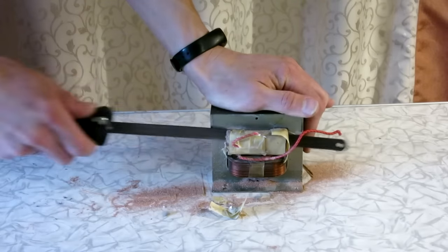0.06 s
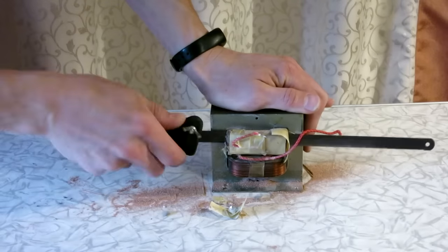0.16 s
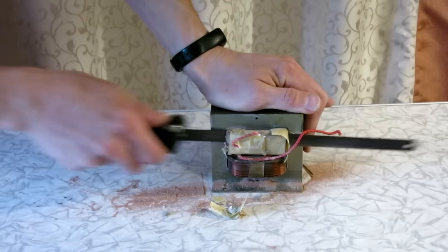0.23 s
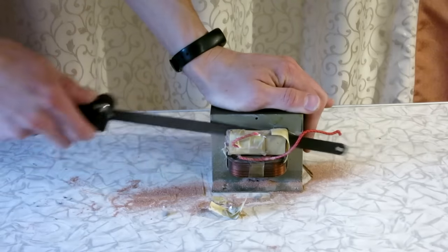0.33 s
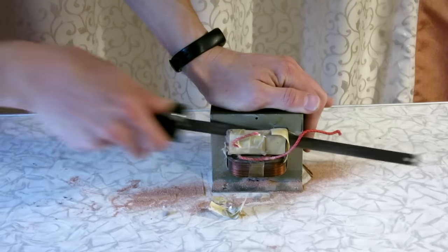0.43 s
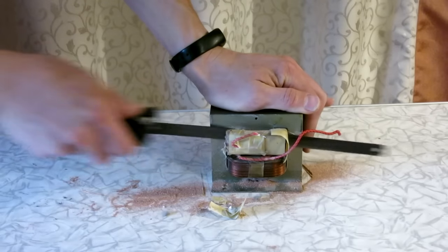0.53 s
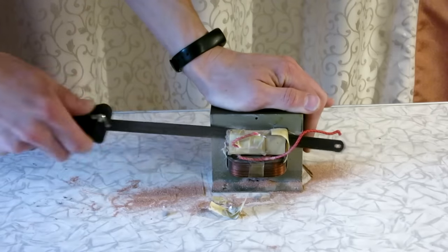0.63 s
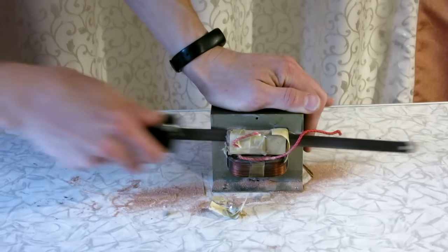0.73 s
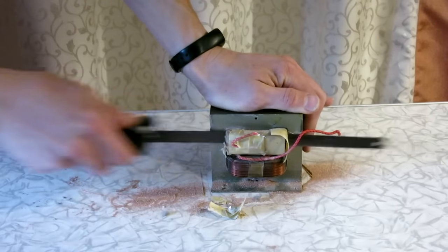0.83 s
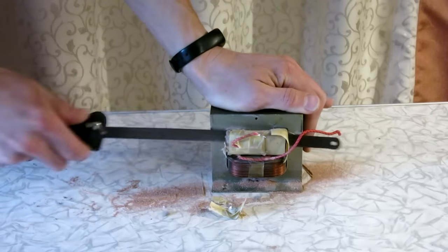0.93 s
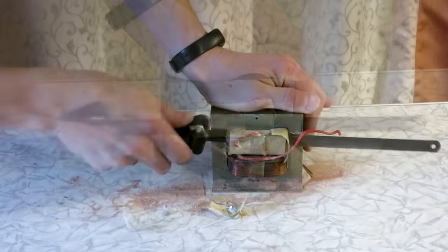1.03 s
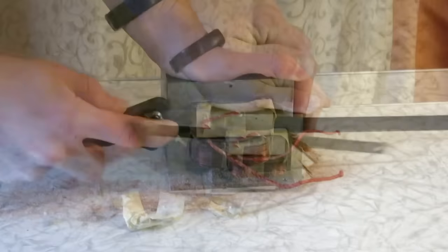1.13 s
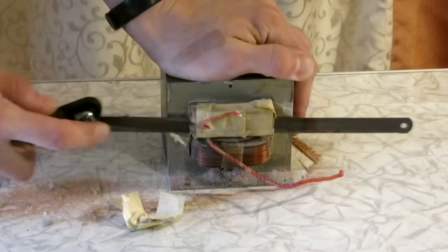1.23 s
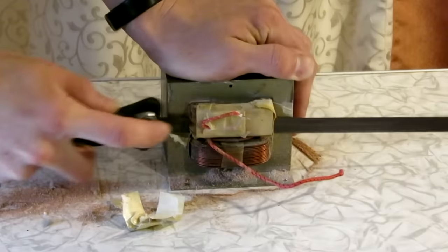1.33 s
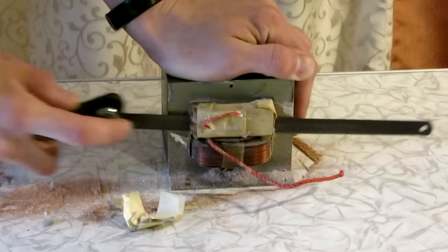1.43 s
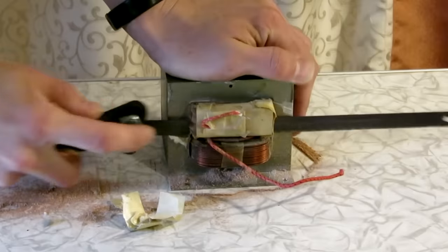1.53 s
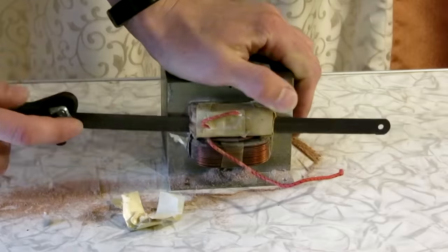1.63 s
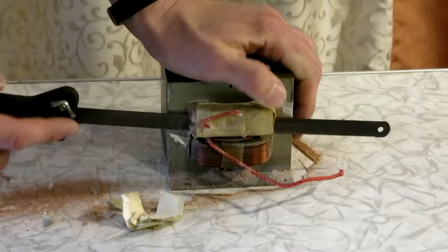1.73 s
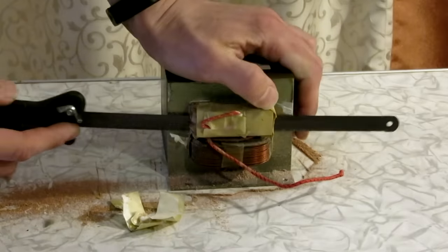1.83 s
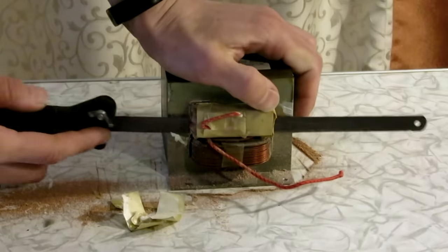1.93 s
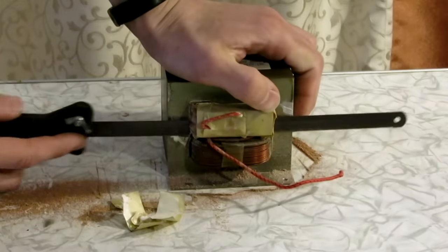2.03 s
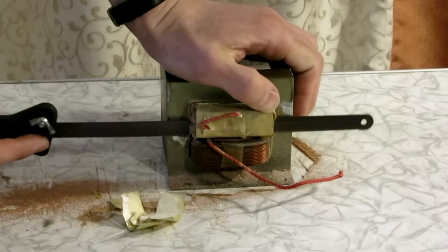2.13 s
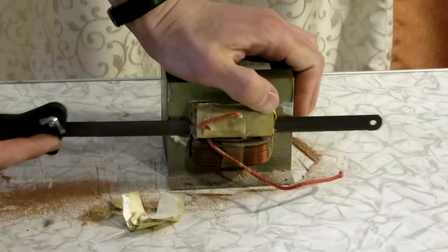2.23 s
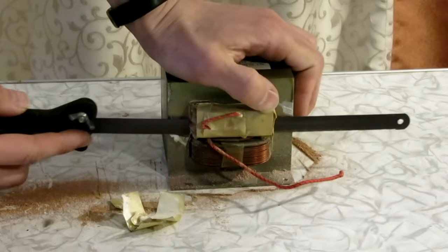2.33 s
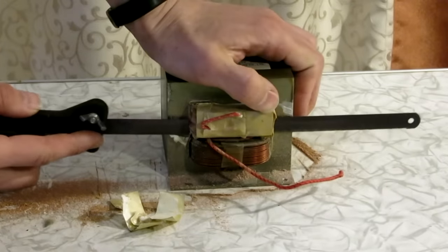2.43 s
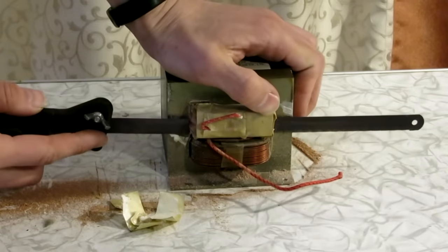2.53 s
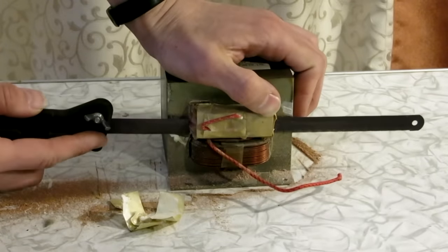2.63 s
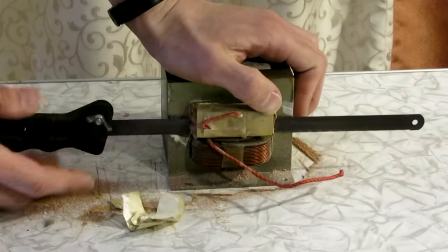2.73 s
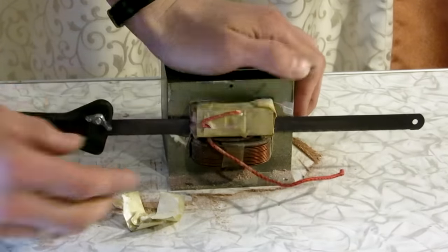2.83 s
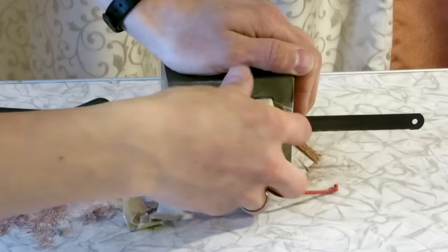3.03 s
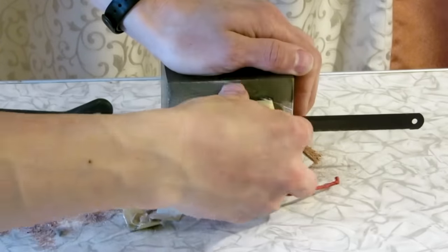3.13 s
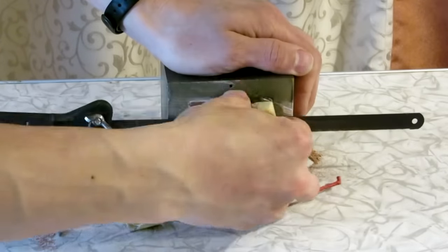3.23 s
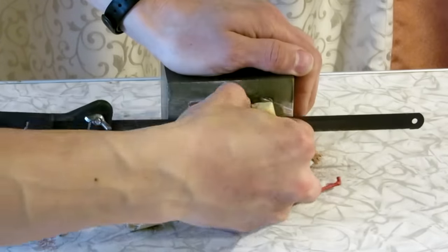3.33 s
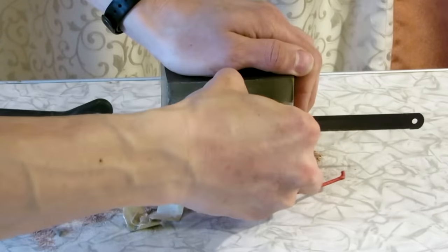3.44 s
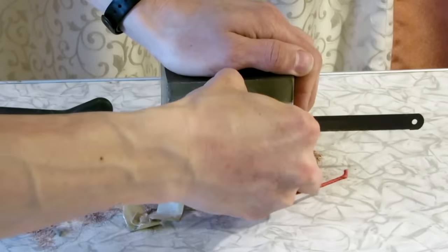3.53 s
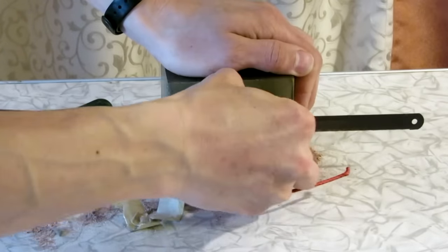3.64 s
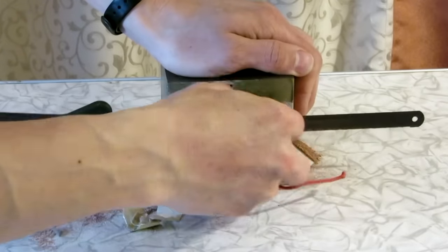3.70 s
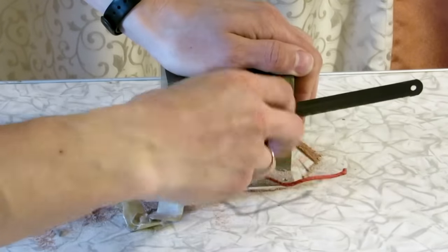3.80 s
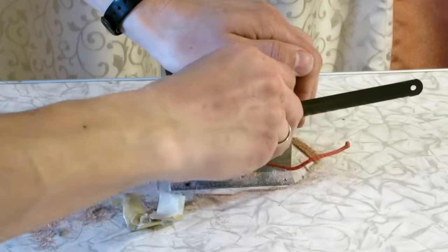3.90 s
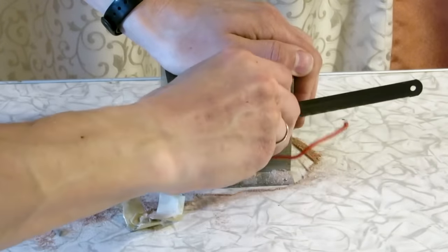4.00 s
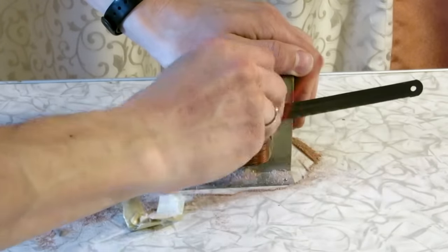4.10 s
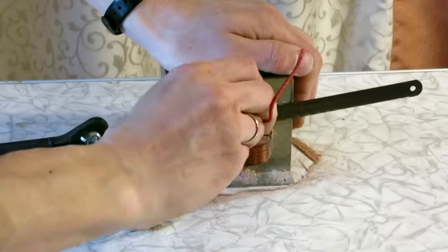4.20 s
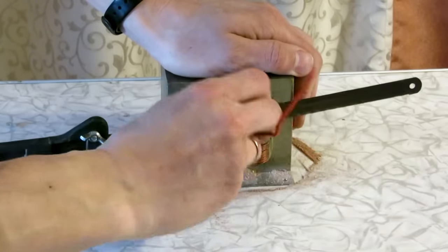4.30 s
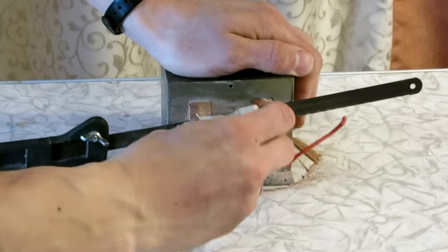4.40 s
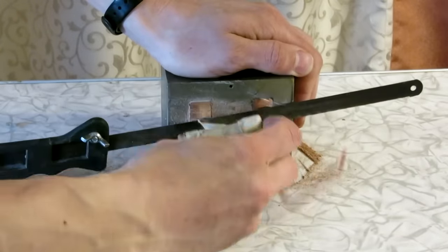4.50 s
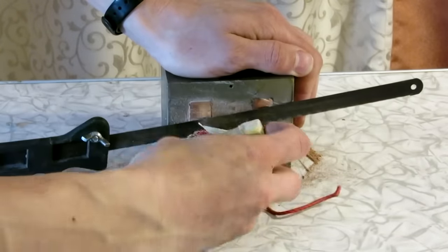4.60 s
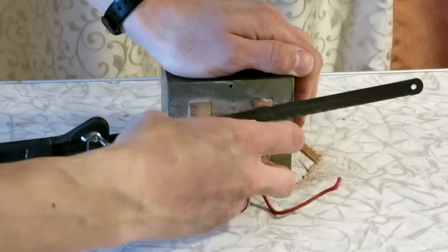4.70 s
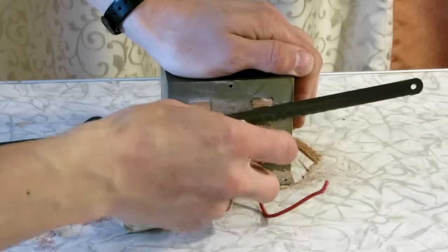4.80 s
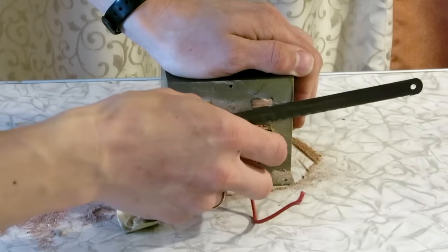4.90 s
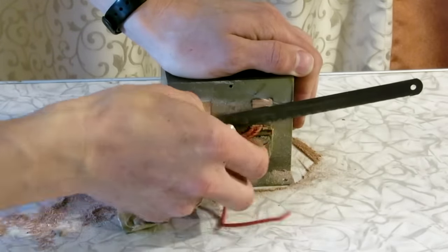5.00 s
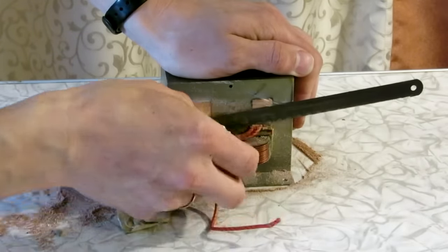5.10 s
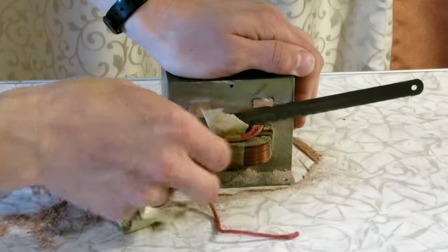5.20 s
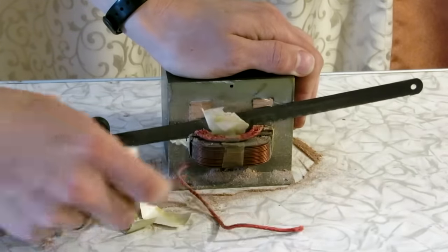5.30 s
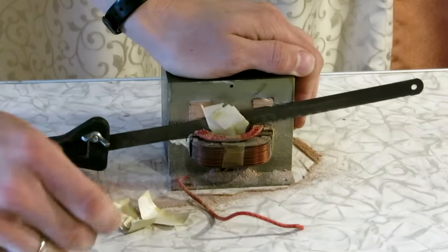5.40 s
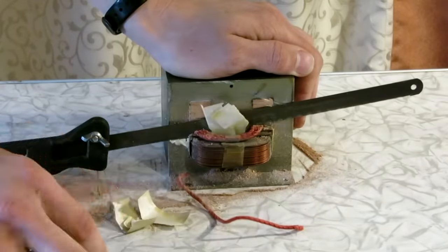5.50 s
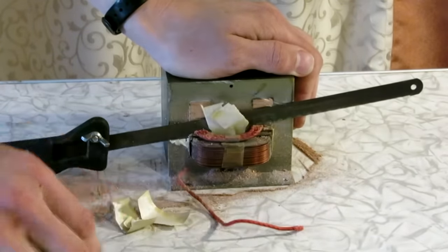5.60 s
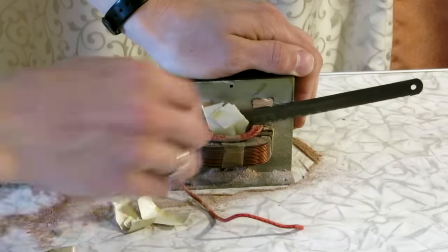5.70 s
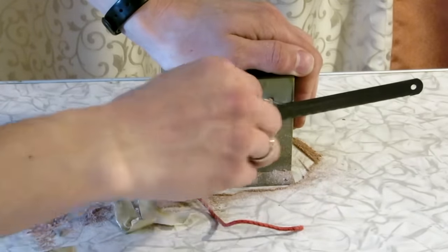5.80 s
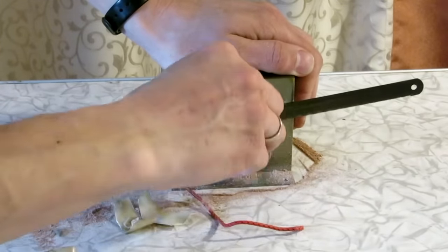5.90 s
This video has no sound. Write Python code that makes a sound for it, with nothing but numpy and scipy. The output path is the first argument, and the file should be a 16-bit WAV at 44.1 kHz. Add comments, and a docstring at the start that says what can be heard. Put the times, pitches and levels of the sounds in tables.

```python
"""A bare hacksaw blade cuts a copper winding on an iron core: bursts of tiny tooth catches make
the rasp and ring the blade, the core and the table it stands on. Then the blade slides loosely in
the slot as hissing noise, and fingers crackle the paper wrap as uneven catches. Wire and paper snap
as a tick and a short ring, and the core bumps the table. Each sound rings in a small furnished room
with faint, nearly steady house noise, as heard by a phone close by."""
import sys
import numpy as np
from scipy import signal
from scipy.fft import rfft, irfft
from scipy.io import wavfile
from scipy.ndimage import uniform_filter1d

SR = 44100
rng = np.random.default_rng(int(sys.argv[2]) if len(sys.argv) > 2 else 0)


def put_to_file(sound):
    """Save the sound as 16-bit audio at rate SR, in the file named by the first command-line argument."""
    columns = np.atleast_2d(sound).T  # one column per channel
    safe = np.clip(columns, -1, 1)
    whole_steps = np.round(safe * 32767)
    wavfile.write(sys.argv[1], SR, whole_steps.astype(np.int16))


N = 262395  # length [samples]
TIMES = np.arange(0, N + 16, 16) / SR  # moments at which gestures are worked out [s]
LINGER = 0.7  # the heavy table follows a gesture more slowly: share of its dB slope

# ringing tones of the saw blade: (frequency [Hz], width [Hz], level [dB])
BLADE_MODES = [(1676, 54, 4), (1806, 55, 2), (1963.5, 35, 11.5), (2216, 230, 5.5), (2250, 410, -2),
               (2540, 50, -1), (2563, 50, -4.5), (2800, 36, 5.5), (2910, 64, 1.5)]
# ringing tones of the iron core: (frequency [Hz], width [Hz], level [dB])
CORE_MODES = [(562, 23, 2), (630, 44, 2.5), (701, 22, 0), (747, 35, 2), (884, 63, -4.5), (996, 82, 6),
              (1084, 33, -6.5), (1163, 60, -2), (1350, 51, -10), (1420, 61, -8.5), (1800, 150, 9.5)]
# ringing tones of the table: (frequency [Hz], width [Hz], level [dB])
TABLE_MODES = [(105, 24, -25.5), (149, 14, -12.5), (180, 12, 11.5), (212, 9.4, 7), (318, 29, 5),
               (420, 60, 3), (503, 40, 6.5), (637, 28, 5)]
# ringing tones of loose wire ends: (frequency [Hz], width [Hz], level [dB])
WIRE_MODES = [(2520, 150, -2), (2800, 110, -2.5), (3500, 88, 0.5), (4300, 250, 4), (4800, 140, 1),
              (5350, 250, 1), (5500, 300, -3.5), (6020, 440, 0.5), (6800, 390, 2), (7600, 450, -1),
              (8600, 500, 1), (9700, 890, 1.5), (10800, 1000, 4), (12200, 900, 1.5)]
# tone colour of crackling paper: (frequency [Hz], level [dB])
PAPER_COLOUR = [(1060, -32.5), (1800, -16), (2090, -14), (2940, 4), (3380, -9.5), (5480, 4.5), (7500, 1),
                (11100, 4), (15500, -2.5), (16500, -23)]
# tone colour of scraping: (frequency [Hz], level [dB])
SCRAPE_COLOUR = [(500, -8), (900, 9.5), (1500, 12.5), (2400, 4), (3400, -17), (5000, -100)]
# wire and paper snap: (time [s], peak [dB], pitch [Hz], ring against the tick [dB])
SNAPS = [(1.409, -15.5, 4350, 0.5), (1.5978, -6.5, 4570, -4.5), (1.8636, -31, 11600, -7),
         (1.8726, -43, 11500, -9), (1.8992, -25, 9800, -2), (1.937, -23.5, 8600, -3),
         (1.945, -11, 7600, -10), (2.0592, -18.5, 5100, -8), (2.088, -20, 5560, -4),
         (2.1853, -14.5, 9700, -7.5), (2.285, -22.5, 7550, 3.5), (2.3218, -21, 7930, 1.5),
         (2.8365, -43, 10600, -2), (3.1644, -33, 7600, -10), (3.276, -40, 9240, -1.5),
         (3.4319, -30, 9370, -8), (3.5161, -3, 5200, -19), (3.7618, -17, 2800, -6), (3.7709, -23, 6050, 6),
         (3.843, -23.5, 2520, -3.5), (3.898, -32.5, 7530, -6), (4.005, -15.5, 3500, -11),
         (4.013, -20, 6800, 1), (4.0374, -28, 5340, -0.5), (4.0798, -21, 10800, -3),
         (4.1005, -6.5, 5770, -5), (4.111, -33, 2800, -14), (4.1832, -33, 12200, 0),
         (4.19, -26.5, 8700, -10), (4.2217, -16.5, 5700, -8), (4.2336, -14, 2520, -17),
         (4.2652, -14, 5300, -10), (4.3416, -7.5, 9000, -11.5), (4.3854, -12, 6900, -27),
         (4.457, -30, 10100, -11), (4.4646, -34, 11800, -7), (4.523, -27.5, 12300, -8),
         (4.562, -18, 12200, -7), (4.575, -16.5, 11600, -17), (4.7052, -42, 10500, -1),
         (4.737, -32.5, 9800, -22), (4.8127, -43.5, 5550, -8), (4.925, -32, 8100, -18),
         (5.148, -31, 8700, -12), (5.1826, -20.5, 11600, -14), (5.2126, -9, 2500, -21),
         (5.2289, -15, 2580, -25), (5.402, -43, 10800, -1), (5.4957, -42, 5350, -6),
         (5.617, -36.5, 9700, -1), (5.669, -50, 4800, -1)]


def undb(db):
    """Turn decibels into a gain."""
    return 10 ** (np.asarray(db) / 20)


def unit(x):
    """Scale a sound to an average (RMS) level of 1."""
    return x / np.sqrt(np.mean(x ** 2))


def cut(x, hz, kind):
    """Gentle low- or high-pass."""
    return signal.sosfilt(signal.butter(2, hz, kind, fs=SR, output="sos"), x)


def colour(x, points, share=1):
    """Filter whose gain follows (Hz, dB) points and which never sounds ahead of its input."""
    hz, db = np.transpose(points)
    bin_hz = np.arange(1025) * SR / 2048
    gain_db = np.interp(np.log(bin_hz + 1), np.log(hz), share * db)
    # folding the cepstrum puts the filter's energy as early as possible
    cepstrum = irfft(gain_db * np.log(10) / 20)
    cepstrum[1:1024] *= 2
    cepstrum[1025:] = 0
    response = irfft(np.exp(rfft(cepstrum)))
    return signal.fftconvolve(x, response)[:len(x)]


def ring(x, hz, width):
    """One resonance, gain 1 at its centre."""
    return signal.lfilter(*signal.iirpeak(hz, hz / width, SR), x)


def walk(rate):
    """Random levels, a new one every 1 / rate seconds with smooth slopes between; spread near 1."""
    step = int(SR / rate)
    held = np.repeat(rng.standard_normal(N // step + 1), step)
    return 1.31 * uniform_filter1d(held, step)[:N]


def grit(per_s, spread_db, burst_db, burst_rate):
    """Tiny random catches of uneven size that come in bursts."""
    hit = rng.random(N) < per_s / SR
    size = undb(spread_db * rng.exponential(size=N)) * rng.standard_normal(N)
    return unit(hit * size * undb(burst_db * walk(burst_rate)))


def body(drive, modes, patchy_db, pitch, reach):
    """Modes of a solid that swell each alone; those near the given pitch ring most."""
    out, power = 0, 0
    for hz, width, db in modes:
        near = undb(db) / (1 + (np.log(hz / pitch) / reach) ** 2)
        patches = undb(patchy_db * walk(30)) if patchy_db else 1
        out = out + near * patches * unit(ring(drive, hz, width))
        power = power + near ** 2
    return out / np.sqrt(power)


def swell(s, rise, hold, fall):
    """Envelope in dB: up 30 dB in rise, level from s for hold, down 30 dB in fall."""
    before = (s - TIMES) / max(rise, .001)
    after = (TIMES - s - abs(hold)) / max(fall, .001)
    return -30 * np.maximum(np.maximum(before, after), 0)


def mix(shapes, db):
    """Level of overlapping gestures, added as powers, as a gain at every sample."""
    power = sum(undb(np.maximum(2 * (shape + d), -400)) for shape, d in zip(shapes, db))
    return np.interp(np.arange(N) / SR, TIMES, np.sqrt(power))


def nearest(times, values):
    """At every sample the value of the gesture closest in time, with soft steps."""
    halfway = (times[1:] + times[:-1]) / 2
    at = np.searchsorted(halfway, np.arange(N) / SR)
    return uniform_filter1d(values[at], size=400)


def place(out_len, s, db, sound):
    """The sound with the given peak level, starting at s."""
    at = int(s * SR)
    scaled = sound * undb(db) / np.abs(sound).max()
    return np.pad(scaled, (at, max(out_len - at - len(sound), 0)))[:out_len]


def air():
    """Distant, nearly steady noise of the house, wide between the channels."""
    # tone colour of the house noise: (frequency [Hz], level [dB])
    air_colour = [(15, -28), (25, -4), (103, 3.5), (163, 3), (470, -3.5), (651, -7), (1150, -2.5),
                  (1320, -8), (3700, -21), (4480, -18.5), (6040, -21.5), (10700, -21.5), (15200, -23.5),
                  (16500, -25)]
    # width of the house noise: (frequency [Hz], side minus mid [dB])
    air_side = [(60, -17.5), (110, -10), (200, 3.5), (380, 12.5), (700, 14), (1290, 8.5), (2380, 7.5),
                (4400, -8), (8120, -5.5), (15000, 0)]
    mid = unit(colour(rng.standard_normal(N) * undb(.8 * walk(1.5)), air_colour))
    side = colour(unit(colour(rng.standard_normal(N), air_colour)), air_side)
    return undb(-59.5) * np.array([mid + side, mid - side])


def room(x):
    """A short, dense echo tail of fading noise, with its own mid and side."""
    # tone colour of the echo tail: (frequency [Hz], level [dB])
    room_colour = [(60, -10), (300, -5), (1200, -5), (4000, -5), (15000, -6)]
    # width of the echo tail: (frequency [Hz], side minus mid [dB])
    room_side = [(60, 0), (300, 4.5), (1000, 8.5), (2200, 6), (4000, -18), (5500, -16), (8500, -4.5),
                 (13000, 10)]
    level_db, t60_s = -13, .17  # t60: time to fade by 60 dB
    t = np.arange(SR // 2) / SR
    tails = rng.standard_normal((2, len(t))) * 10 ** (-3 * t / t60_s) * (t > .002)
    mid, side = (colour(signal.fftconvolve(x, h / np.linalg.norm(h))[:N], room_colour) for h in tails)
    side = colour(side, room_side)
    return undb(level_db) * np.array([mid + side, mid - side])


def bumps():
    """A soft push rings the table; the harder edge of the blow rings core and blade."""
    # bumps of the core on the table: (time [s], thud peak [dB], table pitch [Hz], knock peak [dB])
    bump_rows = [(1.767, -66, 356, -36), (2.198, -35, 231, -36.5), (2.884, -47, 166, -64),
                 (2.898, -38.5, 151, -64), (3.019, -56, 172, -47), (3.278, -37.5, 420, -59.5),
                 (3.427, -43, 534, -64), (3.842, -28, 318, -16.5), (4.105, -32.5, 185, -46),
                 (4.269, -45, 406, -32.5), (4.346, -40, 303, -45), (4.574, -40, 673, -25.5),
                 (5.086, -40.5, 180, -48), (5.144, -40, 412, -48.5), (5.228, -32.5, 560, -23.5),
                 (5.618, -23, 307, -44), (5.629, -22, 617, -37.5)]
    thud_t60_s, knock_t60_s = 0.31, 0.098  # extra fade by 60 dB
    t, out = np.arange(8192) / SR, np.zeros(N)
    noise = rng.standard_normal((len(bump_rows), len(t)))
    for (s, db, pitch, knock_db), n in zip(bump_rows, noise):
        push = cut(cut(n * np.exp(-t / 0.0061), 946, "low"), 190, "high")
        thud = body(push, TABLE_MODES, 0, pitch, reach=0.53)
        edge = cut(n * np.exp(-t / 0.011), 3800, "low")
        knock = body(edge, CORE_MODES + BLADE_MODES, 0, 1200, reach=0.2)
        out += place(N, s, db, thud * 10 ** (-3 * t / thud_t60_s))
        out += place(N, s, knock_db, knock * 10 ** (-3 * t / knock_t60_s))
    return out


def snaps():
    """A hard tick, then a short ring of the wire that let go."""
    # a tooth snags a wire end: (time [s], peak [dB])
    snags = [(0.134, -1), (0.147, -5), (0.1614, -7.5), (0.2798, -11.5), (0.4277, -14), (0.4477, -2.5),
             (0.4716, 4), (0.479, 5.5), (0.4968, -2), (0.5107, -19), (0.5562, -20.5), (0.7176, -6),
             (0.73, -8.5), (0.7463, -5.5), (0.7676, -7.5), (0.7886, -7), (1.0205, -8), (1.037, -9.5),
             (1.1589, -5), (1.3077, -7)]
    snag_hz, snag_ring_db, ring_t60_s = 11000, -4, 0.052
    t, out = np.arange(8192) / SR, np.zeros(N)
    rows = [(s, db, snag_hz, snag_ring_db) for s, db in snags] + SNAPS
    noise = rng.standard_normal((len(rows), len(t)))
    for (s, db, hz, ring_db), n in zip(rows, noise):
        tick = colour(2 * (t == 0) + n * np.exp(-t / 0.00027), PAPER_COLOUR)
        tick = cut(tick, 0.56 * hz, "high")
        tick = cut(tick, 0.56 * hz, "high")  # thin wires click thin
        push = n + 9 * (t == 0)  # the release itself, then rattling
        wire = body(ring(push, hz, 0.59 * hz), WIRE_MODES, 0, hz, reach=0.048)
        wire = cut(wire, 3000, "high") * 10 ** (-3 * t / ring_t60_s)
        out += place(N, s, db, tick) + place(N, s, db + ring_db, wire)
    return out


def drag():
    """The heavy core smooths light catches into a dull noise."""
    return cut(rng.standard_normal(N), 1000, "low")


def fingers():
    """Paper crackles unevenly; skin scrapes on the core and pushes it against the table."""
    # fingers work the paper wrap; rise and fall are times for 30 dB: (time [s], rise [s], hold [s],
    # fall [s], crackle [dB], scrape [dB], table [dB], table pitch [Hz])
    finger_rows = [(2.539, .06, .15, .08, -80.5, -56.5, -78.5, 250),
                   (2.895, 0.067, .002, 0.21, -81.5, -70, -49.5, 188),
                   (3.019, 0.055, 0.028, 0.19, -71, -57, -47, 181),
                   (3.154, .025, 0.0021, 0.17, -56.5, -61, -60, 265),
                   (3.3, 0.14, .002, .2, -63.5, -68, -56.5, 390),
                   (3.428, 0.19, .002, 0.18, -58, -59, -57.5, 393),
                   (3.514, 0.0022, .001, 0.014, -18.5, -50, -35, 372),
                   (3.53, 0.04, .002, 0.085, -39, -71, -46, 343),
                   (3.634, 0.052, 0.026, .06, -68.5, -82, -62, 200),
                   (3.765, .008, 0.0083, 0.058, -41, -74, -53, 192),
                   (3.843, 0.012, 0.00085, 0.056, -40, -22, -26.5, 320),
                   (3.997, 0.0033, 0.021, .05, -37, -54, -61.5, 201),
                   (4.024, .02, 0.051, .03, -43, -69, -54, 195),
                   (4.086, 0.028, .001, 0.037, -29, -50, -46, 282),
                   (4.1, .004, 0.00093, 0.055, -32.5, -55, -36, 190),
                   (4.224, 0.052, 0.071, 0.09, -38.5, -51.5, -54.5, 320),
                   (4.341, 0.0045, .002, 0.046, -37, -42, -65, 298),
                   (4.396, 0.07, 0.0017, 0.036, -34, -50, -46.5, 290),
                   (4.487, 0.26, 0.037, .05, -52, -63, -63, 280),
                   (4.566, 0.027, 0.0017, 0.041, -30, -42.5, -65, 520),
                   (4.732, 0.048, .002, .6, -59, -60.5, -80, 295),
                   (4.934, .065, .002, 0.084, -62, -71, -69, 270),
                   (5.14, 0.19, .03, 0.033, -61.5, -62.5, -58, 350),
                   (5.182, .004, .002, 0.039, -33, -43, -57, 400),
                   (5.223, 0.066, .002, 0.042, -27.5, -35, -51, 430),
                   (5.452, 0.43, 0.066, 0.084, -68, -85.5, -67, 250),
                   (5.624, 0.025, 0.0014, .062, -53, -51, -33, 283)]
    s, _, _, _, crackle_db, scrape_db, table_db, table_hz = np.transpose(finger_rows)
    shapes = [swell(*row[:4]) for row in finger_rows]
    creases = grit(12000, 1.5, 3.0, 120)
    # the crackle also rings the wire, most near the pitch of the snap nearest in time
    snap_s, snap_hz = np.transpose(SNAPS)[[0, 2]]
    wire = body(cut(creases, 2310, "high"), WIRE_MODES, 3.95, nearest(snap_s, snap_hz), reach=0.25)
    paper = undb(-4.5) * unit(colour(creases, PAPER_COLOUR))
    crackle = mix(shapes, crackle_db) * (paper + undb(-8.5) * wire)
    scrape = mix(shapes, scrape_db) * unit(colour(grit(6000, 1.5, 2.8, 60), SCRAPE_COLOUR))
    table = body(drag(), TABLE_MODES, 1.0, nearest(s, table_hz), reach=0.43)
    return crackle + scrape + mix([LINGER * e for e in shapes], table_db) * table


def slides():
    """The blade hisses in the slot, the slot squeaks, the table rumbles below."""
    # loose slides of the blade; rise and fall are times for 30 dB: (time [s], rise [s], hold [s],
    # fall [s], hiss [dB], table [dB], squeak pitch [Hz], table pitch [Hz])
    slide_rows = [(1.441, 0.11, .002, 0.05, -33.5, -37.5, 4300, 387),
                  (1.525, .12, .005, 0.068, -32.5, -37.5, 6700, 300),
                  (1.596, 0.045, 0.00081, 0.02, -27.5, -45.5, 4800, 300),
                  (1.616, 0.022, 0.064, 0.027, -37.5, -48, 4330, 400),
                  (1.769, 0.0073, .001, 0.059, -63, -46.5, 6000, 380),
                  (1.866, 0.0043, .001, 0.063, -50, -63, 7300, 230),
                  (1.946, 0.055, .002, .12, -42, -43, 7600, 203),
                  (2.098, 0.044, 0.068, 0.074, -41, -41.5, 5030, 219),
                  (2.288, 0.022, 0.0096, 0.025, -38.5, -54, 7600, 317),
                  (2.321, .015, 0.0049, 0.053, -43.5, -55, 8100, 350),
                  (2.336, .02, .08, 0.033, -56, -57.5, 7500, 262),
                  (2.489, 0.03, 0.018, 0.037, -54.5, -56, 6230, 239)]
    # tone colour of the sliding blade: (frequency [Hz], level [dB])
    slide_colour = [(1760, -46.5), (3000, -9), (3530, 10), (3770, -13), (4410, 4.5), (6210, -10.5),
                    (7160, -4.5), (13600, 0), (15600, -5.5), (16500, -48)]
    # the slot in the winding rings when rubbed: (frequency [Hz], width [Hz], level [dB])
    winding_modes = [(4200, 450, 0), (4750, 500, -1), (5400, 600, -2), (6200, 800, -2), (7200, 900, 0),
                     (8300, 900, -1)]
    s, _, _, _, hiss_db, table_db, squeak_hz, table_hz = np.transpose(slide_rows)
    shapes = [swell(*row[:4]) for row in slide_rows]
    catches = grit(15000, 1.3, 1.5, 90)
    squeak = body(catches, winding_modes, 0.93, nearest(s, squeak_hz), reach=.1)
    hiss = unit(colour(catches, slide_colour)) + undb(-0.5) * colour(squeak, slide_colour)
    rumble = body(drag(), TABLE_MODES, 0.92, nearest(s, table_hz), reach=0.63)
    below = rumble + undb(-17.5) * unit(colour(catches, SCRAPE_COLOUR))
    return mix(shapes, hiss_db) * hiss + mix([LINGER * e for e in shapes], table_db) * below


def sawing():
    """Each tooth tears chips off the copper; the tearing shakes blade, core and table."""
    # strokes, pull and push in turn: (start [s], length [s], rasp [dB], rasp change from start to
    # end [dB], blade [dB], core [dB], table [dB], core pitch in mid-stroke [Hz])
    strokes = [(-0.04, 0.15, -20, -5, -31.5, -30, -27, 700),
               (0.105, .15, -22.5, -6, -24.5, -29, -36.5, 875),
               (0.242, 0.17, -23, -2, -30.5, -30.5, -31.5, 700),
               (0.392, 0.16, -19, 5, -20.5, -26, -28.5, 754),
               (0.541, 0.16, -21.5, 5, -27.5, -26.5, -24.5, 670),
               (0.701, 0.15, -19.5, -1.5, -19.5, -27.5, -35, 864),
               (0.838, 0.16, -18.5, 5, -31.5, -30, -34, 840), (0.985, 0.17, -21, 3.5, -22, -32, -29, 860),
               (1.133, 0.16, -20.5, 0, -28, -28, -28.5, 820),
               (1.275, 0.12, -25.5, 14, -33, -33.5, -34, 890)]
    # tone colour of the rasp: (frequency [Hz], level [dB])
    rasp_colour = [(400, -24.5), (1200, -8.5), (2000, -7), (3000, -10), (3400, -5.5), (6000, -5.5),
                   (9500, -2), (12700, 1), (15600, -7.5), (16500, -42.5)]
    # thin rings of teeth and torn wire ends: (frequency [Hz], width [Hz], level [dB])
    chip_modes = [(7800, 700, -9.5), (8000, 290, -1.5), (9190, 540, 3.5), (10600, 450, -1.5),
                  (11600, 800, 0.5), (12800, 620, -1.5), (14000, 440, 0.5)]
    # blade pitch, a row for a pull and one for a push: (start [Hz], middle [Hz], end [Hz])
    blade_hz = [(1860, 2720, 2020), (2250, 2300, 1510)]
    # table pitch, a row for a pull and one for a push: (start [Hz], middle [Hz], end [Hz])
    table_hz = [(290, 314, 280), (280, 290, 235)]
    # all pairs below are (pull, push)
    bite_s, lift_s = (0.038, 0.031), (0.046, 0.053)  # teeth bite and let go: time for 30 dB
    core_glide = (0.51, -0.064)  # pitch change over a stroke, share

    start, length, rasp_db, lean_db, blade_db, core_db, table_db, core_hz = np.transpose(strokes)
    t, ways = np.arange(N) / SR, np.arange(len(strokes)) % 2  # way 0 is a pull, 1 a push
    bite = []
    for s, n, lean, w in zip(start, length, lean_db, ways):
        hold = n - bite_s[w] - lift_s[w]
        tilt = lean * (np.clip((TIMES - s) / n, 0, 1) - .5)
        bite.append(swell(s + bite_s[w], bite_s[w], hold, lift_s[w]) + tilt)

    def hump(at, rise, fall):
        """One peak per stroke: place as a share of the stroke, slopes in strokes per 30 dB."""
        return [swell(s + at[w] * n, rise[w] * n, 0, fall[w] * n)
                for s, n, w in zip(start, length, ways)]

    knots = (start[:, None] + length[:, None] * np.array([.05, .5, .95])).ravel()

    def glide(hz):
        """Pitch at every sample, through the start, middle and end of each stroke."""
        return np.interp(t, knots, np.ravel(hz))

    core_path = core_hz[:, None] * (1 + np.outer(np.array(core_glide)[ways], [-.5, 0, .5]))
    teeth = grit(14000, 1.3, 2.2, 160)
    # each thin ring flares at random for a few milliseconds
    flares = sum(undb(db + 9.7 * walk(170)) * unit(ring(teeth, hz, width))
                 for hz, width, db in chip_modes)
    rasp = mix(bite, rasp_db) * (unit(colour(teeth, rasp_colour)) + undb(-9.0) * unit(flares))
    blade = body(teeth, BLADE_MODES, 1.0, glide(np.array(blade_hz)[ways]), reach=0.095)
    core = body(teeth, CORE_MODES, 2.23, glide(core_path), reach=0.26)
    table = body(teeth, TABLE_MODES, 0.68, glide(np.array(table_hz)[ways]), reach=0.2)
    blade = blade * mix(hump(at=(0.54, 0.7), rise=(1.1, 0.86), fall=(0.82, 0.31)), blade_db)
    core = core * mix(hump(at=(0.78, 0.37), rise=(2.1, 2), fall=(0.61, 1.5)), core_db)
    table = table * mix(hump(at=(.12, .85), rise=(0.35, 1.5), fall=(1.5, .6)), table_db)
    # the ringing fades once the last stroke lets go
    cutting = mix([swell(0, 1, start[-1] + length[-1] - lift_s[1], lift_s[1])], [0])
    return rasp + cutting * (blade + core + table)


def scene():
    """Add up the close sounds, then their wall echo, the room and the house noise."""
    # stereo lean of the close sounds: (frequency [Hz], left minus right [dB])
    left_lift = [(100, 0), (4000, 0), (8000, 1.1), (13000, 2)]
    wall_s, wall_db, wall_hz = .0103, -8, 1500
    bass_hz = 104
    near = sawing() + slides() + fingers() + snaps() + bumps()
    # a small hard surface close by sends one clear echo of the treble
    echo = np.pad(cut(near, wall_hz, "high"), (int(wall_s * SR), 0))[:N]
    near = near + undb(wall_db) * echo
    near = cut(near, bass_hz, "high")  # the phone hears no deep bass
    direct = np.array([colour(near, left_lift, share=.5), colour(near, left_lift, share=-.5)])
    return direct + room(near) + air()


def record(dry):
    """The phone rounds the loudest peaks and cuts the top above 15800 Hz."""
    rounded = .72 * np.tanh(dry / .72)
    return signal.sosfilt(signal.ellip(8, .2, 70, 15800, fs=SR, output="sos"), rounded)


dry = scene()
out = record(dry)
put_to_file(out)
```